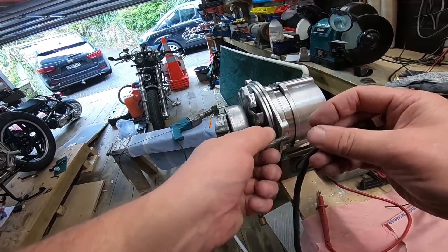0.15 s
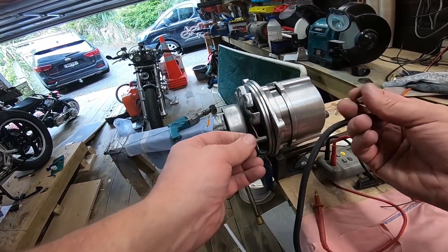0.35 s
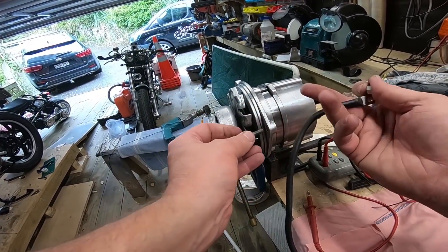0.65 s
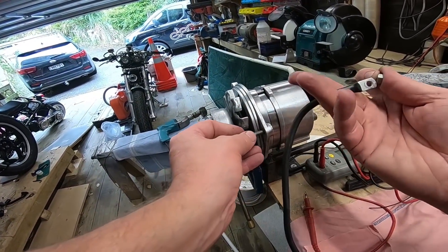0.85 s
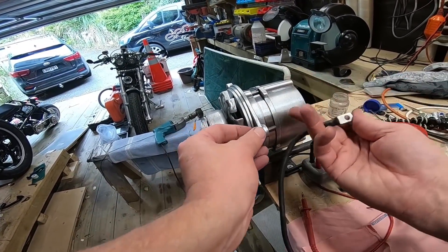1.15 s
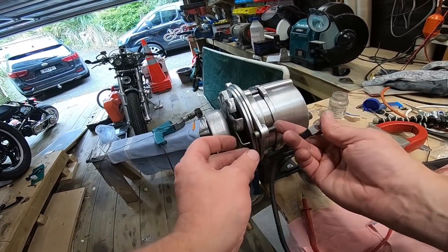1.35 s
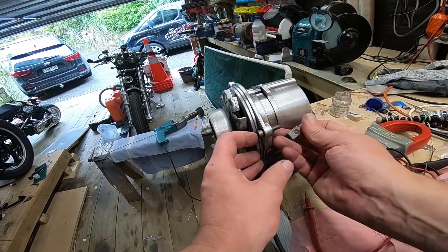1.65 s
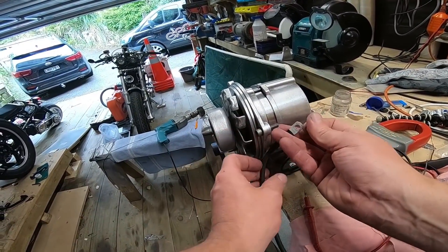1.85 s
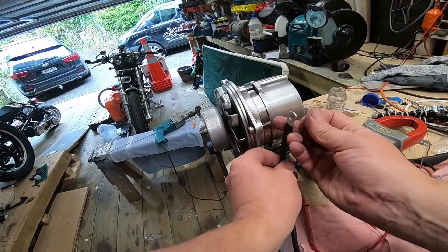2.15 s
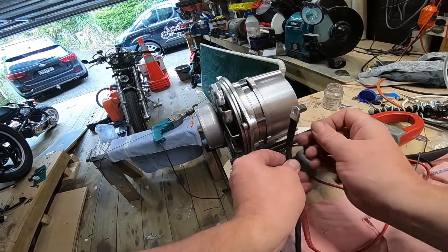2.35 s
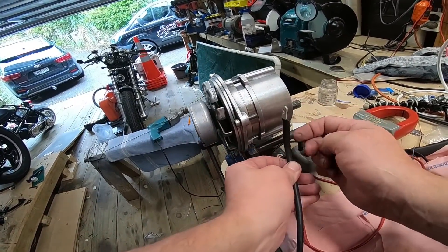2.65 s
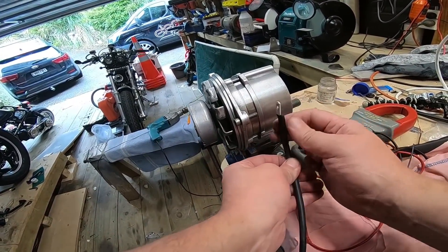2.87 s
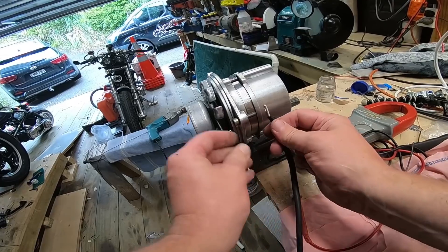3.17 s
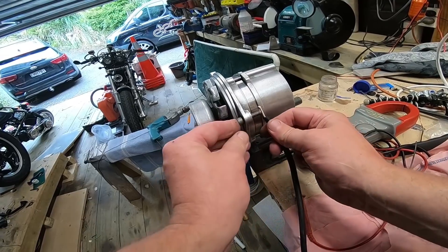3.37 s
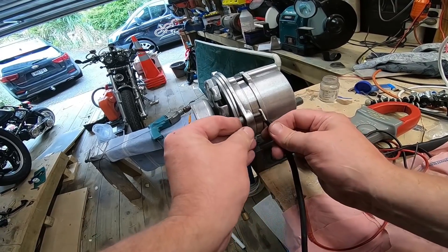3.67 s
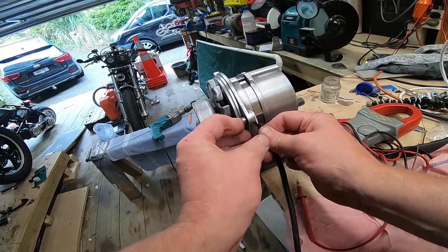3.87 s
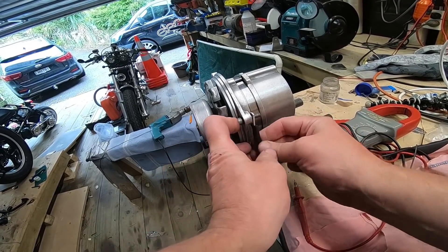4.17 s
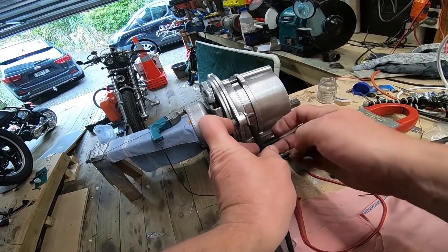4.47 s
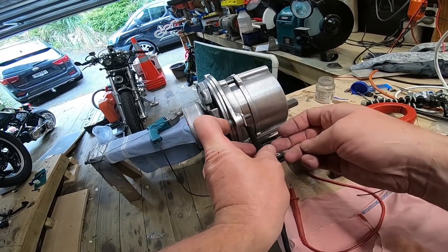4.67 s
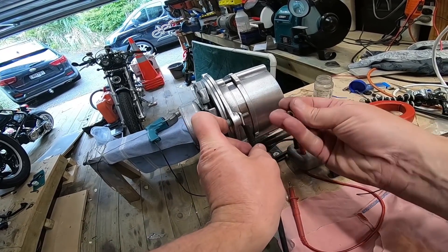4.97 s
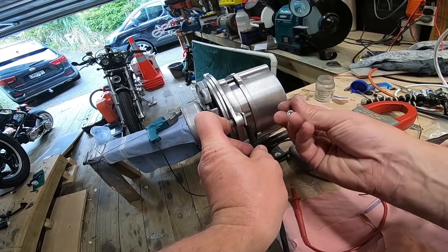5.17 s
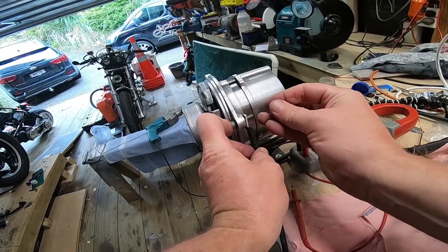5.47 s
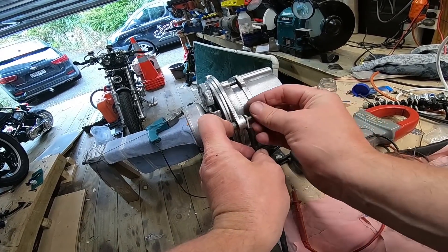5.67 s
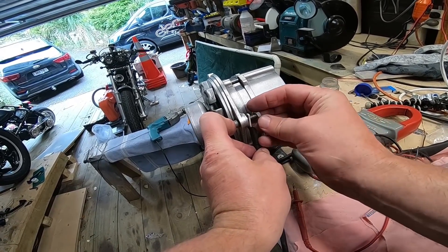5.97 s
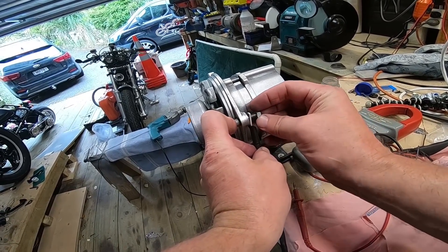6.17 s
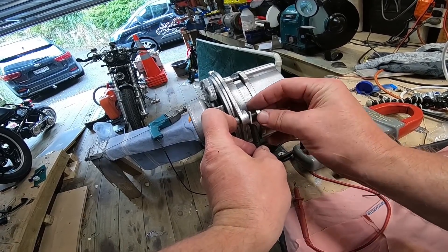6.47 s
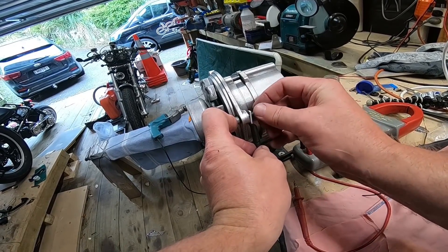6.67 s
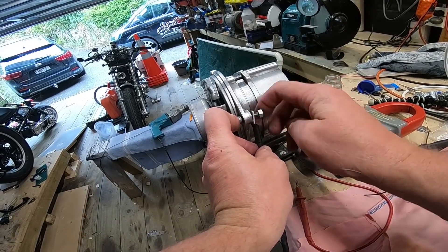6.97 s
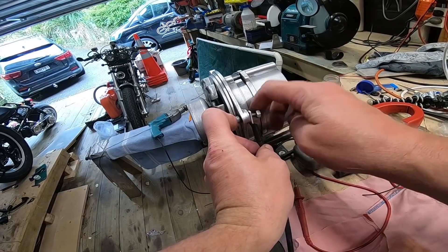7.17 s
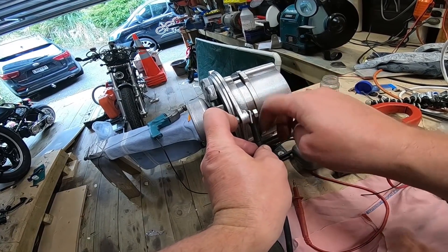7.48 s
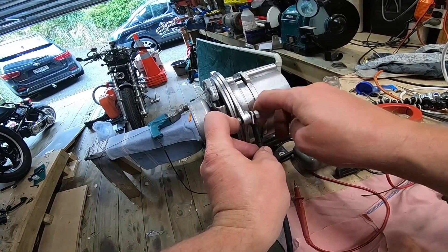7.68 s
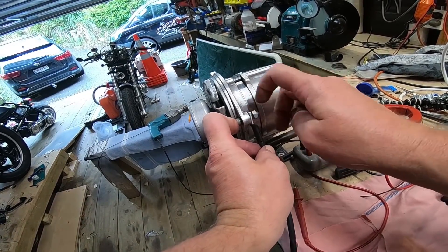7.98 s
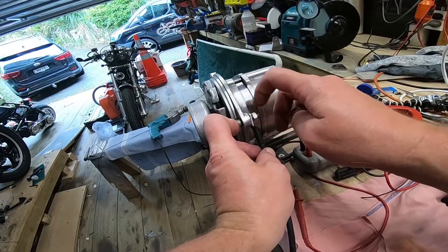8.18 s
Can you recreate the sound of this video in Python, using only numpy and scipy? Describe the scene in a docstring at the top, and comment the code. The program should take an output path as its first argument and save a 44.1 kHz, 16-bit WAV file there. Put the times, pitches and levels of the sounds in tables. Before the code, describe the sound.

Small bright metal clicks and short scrapes as hands fit a cable lug to a metal housing, with dull thumps of clothing bumping the microphone.

```python
"""A dull garage hush and a low hum come first; the hum fades and the hush brightens within a second.
Hands fit a cable lug and a nut on the terminal stud of a metal housing: decaying modes and noise
bursts make the clicks, and trains of tiny slips drive the same kinds of modes as scrapes. Clothing
rubs as clumped noise and bumps the camera worn on the chest, whose shell answers with short swings."""
import sys
import numpy as np
from scipy import signal
from scipy.fft import rfft, irfft, next_fast_len
from scipy.io import wavfile
from scipy.ndimage import uniform_filter1d

SR = 44100
rng = np.random.default_rng(int(sys.argv[2]) if len(sys.argv) > 2 else 0)


def store_pcm(level_fs):
    """Save levels as 16-bit WAV."""
    pcm = np.round(np.clip(level_fs, -1, 1) * 32767).astype(np.int16)
    wavfile.write(sys.argv[1], SR, np.atleast_2d(pcm).T)


N = 367353
T = np.arange(N) / SR  # time [s]
SIDE = np.array([[.5], [-.5]])  # splits a left-right difference evenly: left, right

# Spectra of the garage hush, middle and side parts: frequency_hz, relative_level_db
HUSH_MID = [(210, -36), (350, -5), (560, -6.5), (800, -2.5), (1290, -11.5), (2100, -13.5), (4600, -21),
            (6500, -18), (9000, -24), (11500, -25.5), (14000, -22)]
HUSH_SIDE = [(210, -32), (350, -11.5), (424, -9.5), (591, -16.5), (630, -9), (787, -3.5), (999, -15),
             (1190, -14), (2010, -23.5), (3620, -36.5), (15600, -37)]
# Change of colour while the hush is dull: frequency_hz, change_db
DULL = [(1100, 3.5), (2200, -6), (3500, -12.5), (4600, 0), (6000, -10.5), (9000, -12), (13000, -5)]
HUSH_DB, HUSH_SIDE_DB = -72, 8  # middle part; side part relative to it
DULL_SHARE, DULL_UNTIL_S, DULL_GONE_S = 0.89, 0.61, 0.71

# Low noise carried by body and camera: time_s, level_db
MURMUR = [(0, -55.5), (1.5, -56), (2.82, -63), (2.95, -56.5), (3.5, -66), (4, -56.5), (5.2, -64.5),
          (6.8, -64.5), (7.4, -59), (8.33, -59)]
# Its spectrum: frequency_hz, relative_level_db
MURMUR_COLOUR = [(80, -36), (125, -8), (165, 4), (250, -3.5), (330, -11.5), (500, -26.5), (1100, -33),
                 (5000, -100)]
RUBBED_DB = 7.5  # murmur stirred by rubbing cloth, relative to the rub
# Deep rumble of small body movements, resting level: time_s, level_db
RUMBLE = [(0, -54.5), (1, -69), (4.5, -67.5), (6.9, -71), (7.2, -62), (8.33, -65.5)]
# Its spectrum: frequency_hz, relative_level_db
RUMBLE_COLOUR = [(15, 4), (30, 15), (50, 11.5), (80, 3), (120, -2.5), (200, -60), (500, -100)]
# Brief swells of the rumble: time_s, added_level_db
SWELLS = [(.87, -52.5), (1.62, -59), (7.04, -51), (7.9, -47)]
SWELL_S = 0.034  # exponential rise and fall constant

# Partials of the low hum: multiple_of_pitch, relative_level_db
HUM_PARTS = [(1, 0), (3, -8), (4, -6), (5, -9)]
HUM_HZ, HUM_DB, HUM_S = 41.05, -56, 0.74  # pitch, opening level, time to fall by 9 dB

# Cloth rubbing near the microphones: start_s, firmest_s, end_s, level_db
RUBS = [(.47, .62, 0.69, -69.5), (.95, 1.1, 1.2, -63), (1.86, 1.91, 1.97, -59), (1.92, 2.07, 2.3, -54),
        (2.31, 2.4, 2.504, -65.5), (2.46, 2.58, 2.715, -67.5), (2.98, 3.13, 3.3, -69)]
# Short scuffs of cloth: time_s, level_db
SCUFFS = [(1.8896, -73), (2.176, -90), (2.293, -63), (2.372, -62), (3.9275, -66), (4.402, -52),
          (4.751, -63), (5.671, -59.5), (5.683, -75), (6.24, -67), (7.143, -68.5)]
# Spectra of cloth, middle and side parts: frequency_hz, relative_level_db
CLOTH_MID = [(300, -1), (586, -28), (705, 5), (928, -25), (1280, -7), (2250, -0.5), (2920, -17),
             (3620, -14), (5000, -26.5), (6900, -20), (9000, -30), (15500, -48)]
CLOTH_SIDE = [(240, -35), (400, -6), (800, -19), (1260, -11), (2250, -14), (3010, -37.5), (4920, -40),
              (7210, -33.5), (9000, -48), (15500, -63)]

# Clicks of lug and nut on the stud: time_s, bright_group_db, low_ring_db
CLICKS = [(0.6838, -53.5, -82), (0.764, -52, -82), (0.836, -33, -42.5), (0.875, -46, -43.5),
          (0.9027, -46.5, -47.5), (0.9454, -37, -42), (1.0048, -31.5, -59), (1.057, -38.5, -49),
          (1.3389, -47, -51), (1.3889, -60, -50.5), (1.55, -60, -57), (1.6908, -52, -50), (1.719, -58, -52),
          (2.0192, -46.5, -69), (3.0674, -48.5, -77), (3.361, -55.5, -68), (3.4266, -55, -62.5),
          (3.544, -77, -65), (3.5894, -55, -55), (3.6206, -47.5, -51.5), (3.6494, -67, -51.5),
          (3.685, -69, -56.5), (3.727, -45.5, -50.5), (3.7538, -32, -57), (3.7908, -25, -43.5),
          (3.8118, -33, -39), (3.8537, -40, -61), (3.9856, -53.5, -53), (4.0026, -56, -48),
          (4.1573, -33.5, -42), (4.3935, -48.5, -60), (4.4653, -43, -53), (4.775, -70, -67),
          (5.009, -59, -74), (5.694, -47, -62), (5.809, -60, -60), (5.894, -72, -65), (5.918, -62, -64),
          (6.215, -68, -67), (6.3476, -40, -56), (6.778, -51, -70), (6.835, -42.5, -65),
          (6.9701, -50.5, -67), (7.0284, -41.5, -61), (7.186, -50.5, -62), (7.214, -46.5, -56),
          (7.2493, -40.5, -49), (7.2889, -47.5, -54), (7.375, -63, -64), (7.418, -58, -59),
          (7.451, -44, -69), (7.6082, -48, -77), (7.6497, -53.5, -61), (7.7477, -51, -71),
          (7.822, -48.5, -69), (7.855, -46.5, -70), (7.897, -44, -59.5), (8.0483, -52.5, -58),
          (8.115, -45, -60), (8.2287, -63, -57), (8.2442, -52.5, -52.5), (8.278, -47, -60),
          (8.3016, -50, -51.5)]
# Modes of housing and lug, before the fingers damp them: frequency_hz, relative_level_db, t60_s
BRIGHT = [(5610, 0, 0.1), (5850, -5, 0.03), (6200, 7, 0.022), (6820, -8, 0.053), (7100, -7, 0.2),
          (7750, -6.5, 0.089)]
RING = [(1847, -2.5, 0.16), (1983, -16.5, 0.48), (2130, -7, 0.028), (2215, -12, 0.098)]
MIDDLE = [(2795, 4.5, 0.015), (2888, -4.5, 0.054), (3160, 3, 0.016), (3513, -8, 0.039), (4223, -6, 0.046),
          (4400, -4, 0.029)]
# Modes too dense to tell apart, a tick and short fizz: frequency_hz, relative_level_db
CRACK = [(500, -31), (1200, -29), (2500, -19.5), (4800, -18.5), (5500, -13), (6800, -5.5), (7800, -14),
         (8600, -23.5), (11000, -29.5), (15000, -38)]
# Duller part of the contact: frequency_hz, relative_level_db
KNOCK = [(700, -8), (1500, -15.5), (2300, -1), (3000, -4.5), (4300, -10.5), (5200, -22), (9000, -64)]
# Brittle snaps on top of some clicks: time_s, level_db
SNAPS = [(0.6838, -66), (3.8535, -52), (4.1565, -41.5), (6.836, -67), (7.8211, -58)]
# Spectrum of a snap: frequency_hz, relative_level_db
SNAP_COLOUR = [(5000, -10), (9500, 2), (15000, -11)]
# Tings of a loose washer: time_s, level_db
TINGS = [(1.288, -63.5), (1.7684, -53.5), (3.2248, -52)]
# Modes of the washer, before damping: frequency_hz, relative_level_db, t60_s
WASHER = [(4150, 0, .2), (6130, -20, .15), (6640, -18, .15), (7924, -23, .15)]
# How the two microphone ports hear the metal: frequency_hz, left_right_db, left_lead_rad
PORTS = [(1980, 5, -0.7), (2130, -2.5, -2), (2700, -3, 0.2), (4200, 0, 0.9), (5670, 9, -1.9),
         (7250, 17, -2.2), (8300, 6.5, 1.5)]
# The middle group's level: share of the way from bright to ring in dB, then an offset
MIDDLE_SHARE, MIDDLE_CLICK_DB, MIDDLE_SLIDE_DB = 0.47, -6.5, -2.5

# Metal sliding on metal: start_s, firmest_s, end_s, bright_group_db, low_ring_db
SLIDES = [(0.898, 0.97, 1.09, -51.5, -47.5), (1.042, 1.078, 1.133, -57.5, -50.5),
          (1.153, 1.189, 1.218, -39.5, -35), (3.733, 3.767, 3.817, -48, -49.5),
          (3.791, 3.793, 3.9, -45, -46), (5.774, 5.81, 5.845, -60, -70.5), (6.646, 6.736, 7.27, -73.5, -83),
          (7.18, 7.25, 7.3, -67, -72), (7.387, 7.438, 7.59, -60, -64), (7.6, 7.628, 7.68, -67, -75),
          (7.794, 7.876, 7.93, -64.5, -71.5), (8.05, 8.11, 8.27, -69, -59.5)]
SLIPS_PER_S, SLIP_SPREAD_DB = 900, 3.5
SLIDE_PEAKED, RUB_PEAKED = 2.67, 1.12  # power on a stroke's arch: higher is more pointed

# Bumps against the camera body: largest_swing_s, level_db, swing_hz, relative_sway_db
BUMPS = [(1.013, -45, 189, -17), (1.117, -43.5, 210, 5), (1.752, -32.5, 188, 0), (1.895, -32.5, 162, 8.5),
         (1.922, -30, 191, -8), (1.938, -37, 195, -9), (1.962, -39, 221, -5), (1.992, -31.5, 230, -6.5),
         (2.024, -30.5, 244, -9.5), (2.046, -28, 157, -2), (2.103, -25.5, 186, 6.5), (2.302, -37, 186, 9),
         (2.381, -26, 192, 7), (2.403, -39.5, 230, 14.5), (3.835, -40.5, 174, -12), (3.855, -37.5, 273, 0),
         (3.872, -27.5, 232, -9), (3.903, -37.5, 252, -8), (3.923, -34.5, 257, -29),
         (3.942, -37, 252, -14.5), (4.409, -24, 195, 6), (4.757, -46, 151, 9), (5.619, -23.5, 244, -33),
         (5.637, -34.5, 263, -14), (5.658, -31.5, 200, -21), (5.681, -32.5, 214, -0.5),
         (7.368, -44.5, 230, 1.5)]
# Bumps with much sway lean to the right: relative_sway_db, left_right_db
LEAN = [(-10, 1), (-6, -0.5), (7.5, -9.5)]
EDGE_HZ = 15750


def gain_of(db):
    """Decibels are logarithmic: 20 dB is a factor of ten in amplitude."""
    return 10 ** (np.asarray(db) / 20)


def evened(x):
    """Normalization of power: scales to rms 1."""
    return x / np.sqrt(np.mean(x ** 2) + 1e-20)


def coloured(x, points):
    """Linear filtering: weights the spectrum by (Hz, dB) points joined on a log frequency axis."""
    hz, db = np.transpose(points)
    length = x.shape[-1]
    size = next_fast_len(length)
    f = np.fft.rfftfreq(size, 1 / SR)
    weights = gain_of(np.interp(np.log(f + 1), np.log(hz), db))
    return irfft(rfft(x, size) * weights, size)[..., :length]


def hiss(points):
    """Stationary noise: many unrelated motions sum to a Gaussian signal of fixed spectrum."""
    return evened(coloured(rng.standard_normal(N), points))


def lumps(seconds, depth_db):
    """Random modulation: smoothed noise makes a level wander over about the given time."""
    width = max(int(seconds * SR), 1)
    smooth = uniform_filter1d(rng.standard_normal(N), width)
    smooth = uniform_filter1d(smooth, width)
    return gain_of(depth_db * evened(smooth))


def level_curve(points):
    """Amplitude envelope: follows straight lines in dB between (s, dB) points."""
    return gain_of(np.interp(T, *np.transpose(points)))


def strokes(rows, peaked):
    """Pressure envelope: each stroke arches up to its firmest moment and down again."""
    out = np.zeros(N)
    for start, firmest, end, db in rows:
        progress = np.interp(T, [start, firmest, end], [0, .5, 1])
        out += gain_of(db) * np.abs(np.sin(np.pi * progress)) ** peaked
    return out


def add(mix, s, sound):
    """Superposition: adds a sound into the mix, starting at s seconds."""
    part = mix[:, round(s * SR):][:, :sound.shape[1]]
    part += sound[:, :part.shape[1]]


def hush():
    """Diffuse field: middle and side noise form garage air and microphone hiss, dull at first."""
    mid = hiss(HUSH_MID)
    side = gain_of(HUSH_SIDE_DB) * hiss(HUSH_SIDE)
    clear = gain_of(HUSH_DB) * lumps(.15, .5) * np.array([mid + side, mid - side])
    dull_share = np.interp(T, [DULL_UNTIL_S, DULL_GONE_S], [DULL_SHARE, 0])
    return dull_share * coloured(clear, DULL) + (1 - dull_share) * clear


def murmur():
    """Partial coherence: lumpy low noise is mostly common to both sides, later more separate."""
    share = np.interp(T, [.6, 1.2], [.9, .3])  # common part of the power
    low = level_curve(MURMUR) + gain_of(RUBBED_DB) * strokes(RUBS, RUB_PEAKED)
    deep = level_curve(RUMBLE)
    for s, db in SWELLS:
        deep += gain_of(db) * np.exp(-np.abs(T - s) / SWELL_S)
    out = np.zeros((2, N))
    for colour, force, seconds in ((MURMUR_COLOUR, low, .02), (RUMBLE_COLOUR, deep, .05)):
        common, left, right = (hiss(colour) * lumps(seconds, 2.2) for _ in range(3))
        separate = np.array([left, gain_of(4.0) * right])
        out += force * (np.sqrt(share) * common + np.sqrt(1 - share) * separate)
    return out


def hum():
    """Harmonic series: a few wavering partials of one low pitch die away together."""
    parts = np.zeros(N)
    for multiple, db in HUM_PARTS:
        cycles = multiple * HUM_HZ * T + rng.random()
        parts += gain_of(db) * lumps(0.17, 0.89) * np.sin(2 * np.pi * cycles)
    fade_db = 9 * (T / HUM_S) ** 5
    return np.sqrt(2) * gain_of(HUM_DB - fade_db) * parts  # sqrt(2): sine peak for rms 1


def cloth():
    """Friction noise: fibres drag in clumps; spaced ports hear the lower part in opposite phase."""
    drag = rng.standard_normal(N) * lumps(.002, 2.) * lumps(.015, 1.2)
    mid = evened(coloured(drag, CLOTH_MID))
    quarter_turned = signal.hilbert(drag, next_fast_len(N))[:N].imag
    side = coloured(quarter_turned + 1.3 * rng.standard_normal(N), CLOTH_SIDE)
    side = gain_of(5.5) * evened(side)
    force = strokes(RUBS, RUB_PEAKED)[None]
    for s, db in SCUFFS:
        add(force, s, gain_of(db - 60 * T[None, :4000] / 0.12))
    return force * np.array([mid + side, gain_of(1) * (mid - side)])


def middle(bright_db, ring_db):
    """Interpolation in level: the middle modes lie between the bright modes and the low ring."""
    return bright_db + MIDDLE_SHARE * (ring_db - bright_db)


def ringing(modes, spread_db=0., held=.04):
    """Modal decay: the place of the blow reweights a part's modes, and fingers soon damp them."""
    t, out = T[:9000], np.zeros((2, 9000))
    port_hz, port_db, port_lead = np.transpose(PORTS)
    draws = rng.standard_normal((len(modes), 2))
    for (hz, db, t60), (luck, turn) in zip(modes, draws):
        pan_db = np.interp(hz, port_hz, port_db)
        lead = np.interp(hz, port_hz, port_lead)
        envelope = gain_of(db + spread_db * luck - 60 * t / t60 + SIDE * pan_db)
        out += envelope * np.sin(2 * np.pi * hz * t + turn + SIDE * lead)
    bounces = np.zeros(500)  # the loose part chatters within 11 ms
    bounces[0] = 1
    bounces[rng.integers(40, 500, size=3)] = rng.uniform(-.7, .7, size=3)
    out = out * np.minimum(t / 0.00046, 1)  # onset ramp
    out = signal.oaconvolve(out, bounces[None])[:, :9000]
    return out * np.exp(-(t / held) ** 4) / np.abs(out.mean(0)).max()


def crack(colour, own_share):
    """High modal density: first contact is a noise tick and fizz, partly different on each side."""
    t = T[:9000]
    common, own = rng.standard_normal(9000), rng.standard_normal((2, 9000))
    burst = evened(coloured(common + own_share * own, colour))
    tick = gain_of(-60 * t / .018)
    fizz = gain_of(-15 - 60 * t / .13)
    return burst * np.minimum(t / .0014, 1) * (tick + fizz)


def clicks():
    """Impact excitation: each click rings three groups of modes; snaps and washer tings join in."""
    out = np.zeros((2, N))
    for s, bright_db, ring_db in CLICKS:
        bright = gain_of(-14) * ringing(BRIGHT, 4.5) + gain_of(-5.5) * crack(CRACK, 3.2)
        add(out, s, gain_of(bright_db) * bright)
        add(out, s, gain_of(ring_db) * ringing(RING, 2., held=.032))
        body = gain_of(3.5) * ringing(MIDDLE, 3.2, held=0.086) + gain_of(-1.0) * crack(KNOCK, 0.28)
        add(out, s, gain_of(middle(bright_db, ring_db) + MIDDLE_CLICK_DB) * body)
    for s, db in SNAPS:
        add(out, s, gain_of(db) * crack(SNAP_COLOUR, 2.9))
    for s, db in TINGS:
        add(out, s, gain_of(db) * ringing(WASHER, 2., held=.07))
    return out


def slides():
    """Stick-slip excitation: uneven tiny slips, hundreds a second, drive the same modes."""
    sizes = gain_of(SLIP_SPREAD_DB * np.minimum(rng.exponential(1, N), 4))
    slips = (rng.random(N) < SLIPS_PER_S / SR) * sizes * rng.choice([-1, 1], N)
    slips = evened(slips)
    place = rng.integers(0, 3, N)  # each slip strikes one of three places
    start, firmest, end, bright_db, ring_db = np.transpose(SLIDES)
    middle_db = middle(bright_db, ring_db) + MIDDLE_SLIDE_DB

    def bright():
        """Modal response of the bright group with its crack."""
        return ringing(BRIGHT, 2.7, held=0.017) + gain_of(9.0) * crack(CRACK, 0.82)

    def ring():
        """Modal response of the low ring."""
        return ringing(RING, 2.4, held=0.023)

    def body():
        """Modal response of the middle group with its knock."""
        return ringing(MIDDLE, 1.8, held=0.018) + gain_of(-7) * crack(KNOCK, 0.58)

    out = np.zeros((2, N))
    for db, answer in ((bright_db, bright), (ring_db, ring), (middle_db, body)):
        drive = slips * strokes(zip(start, firmest, end, db), SLIDE_PEAKED)
        for k in range(3):
            sound = answer()
            sound = sound / np.linalg.norm(sound.mean(0))
            out += signal.oaconvolve((drive * (place == k))[None], sound)[:, :N]
    return out


def bumps():
    """Damped oscillation: the camera shell swings, then sways, with a rough thud and opposed knock."""
    out, t = np.zeros((2, N)), T[:3500] - .015  # t = 0 at the largest swing
    thud_colour = [(150, -3), (330, 2), (480, -3.0), (900, -53.0)]  # Hz, dB
    for s, db, hz, sway_db in BUMPS:
        pan_db = np.interp(sway_db, *np.transpose(LEAN))
        width = np.where(t < 0, .003, .005)  # rises faster than it falls
        swing = -np.exp(-.5 * (t / width) ** 2) * np.cos(2 * np.pi * hz * t - 0.7 * SIDE)
        swing *= gain_of(db)
        late = np.maximum(t + 0.00254, 0) / 0.0073
        sway = late * np.exp(-late) * np.cos(2 * np.pi * 68 * (t - .006) - 1.97 * SIDE)
        sway *= gain_of(db + sway_db)
        thud = evened(coloured(rng.standard_normal((2, 3500)), thud_colour))
        thud *= gain_of(db - 22.5) * np.exp(-np.abs(t) / 0.015)
        knock = np.exp(-.5 * ((t + 0.0039) / 0.00068) ** 2) * np.cos(2 * np.pi * 620 * t)
        knock = gain_of(db - 8) * knock * (2 * SIDE + 0.17)  # nearly opposite on the two sides
        add(out, s - .015, (swing + sway) * gain_of(SIDE * pan_db) + thud + knock)
    return out


def garage(x):
    """Reverberation: sparse decaying reflections, arriving at other times on each side."""
    present = rng.random((2, 12000)) < .05
    taps = rng.choice([-1., 1.], (2, 12000)) * present * gain_of(-60 * T[:12000] / 0.26)
    taps[:, :250] = 0  # gap before the first reflection
    return signal.oaconvolve(x, taps / np.linalg.norm(taps[0]), axes=1)[:, :N]


def scene():
    """Superposition of all sources at the two microphones; only the metal gets reflections."""
    background = hush() + murmur() + hum()
    rubbing = cloth()
    metal = clicks() + slides()
    room = gain_of(-17) * garage(metal)
    return background + rubbing + metal + room + bumps()


def record(dry):
    """Band limitation: a steep linear-phase low-pass sets the camera's upper edge."""
    low_pass = signal.firwin(511, EDGE_HZ, window=("kaiser", 9), fs=SR)
    return signal.oaconvolve(dry, low_pass[None], "same")


dry = scene()
out = record(dry)
store_pcm(out)
```